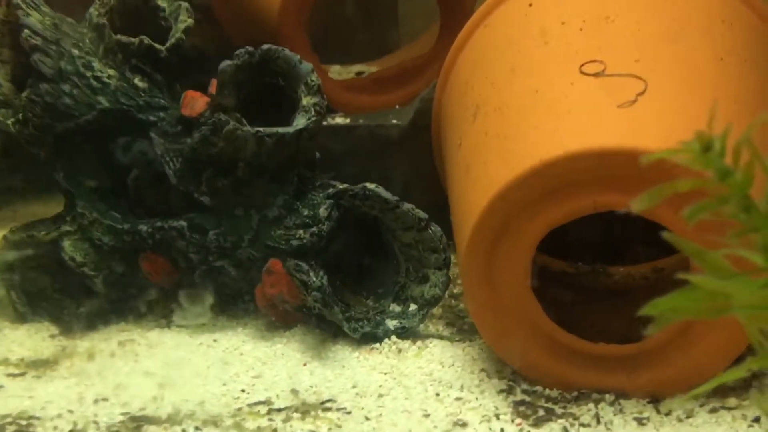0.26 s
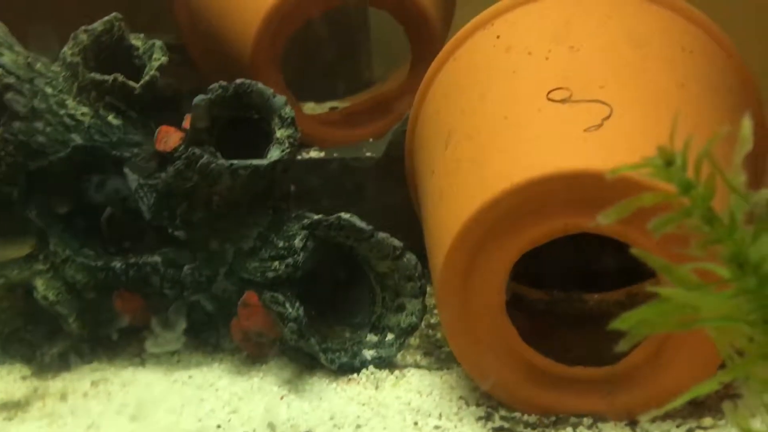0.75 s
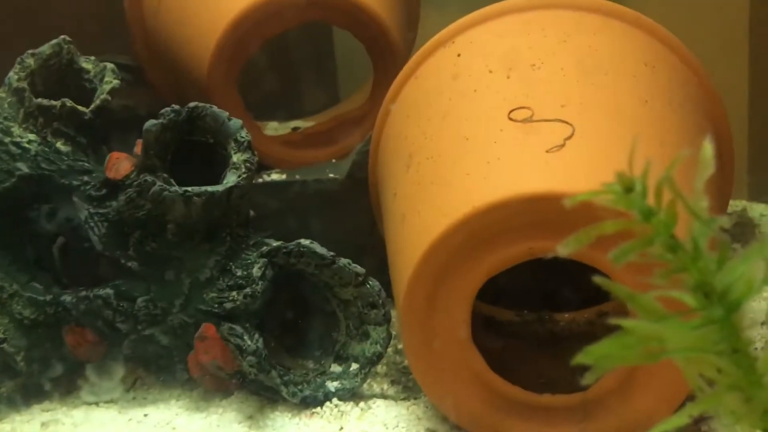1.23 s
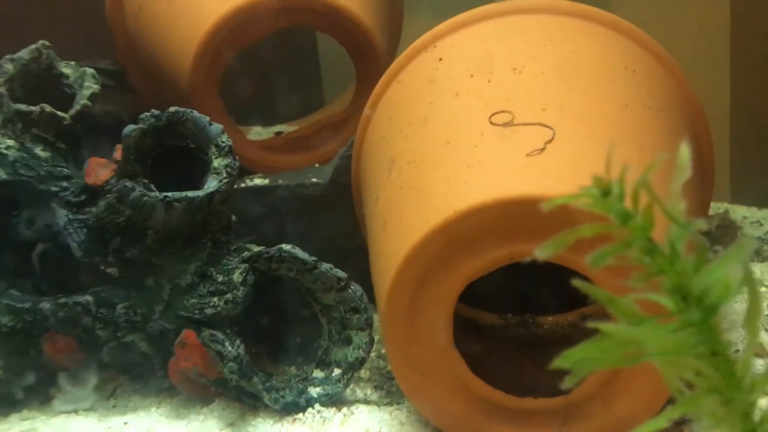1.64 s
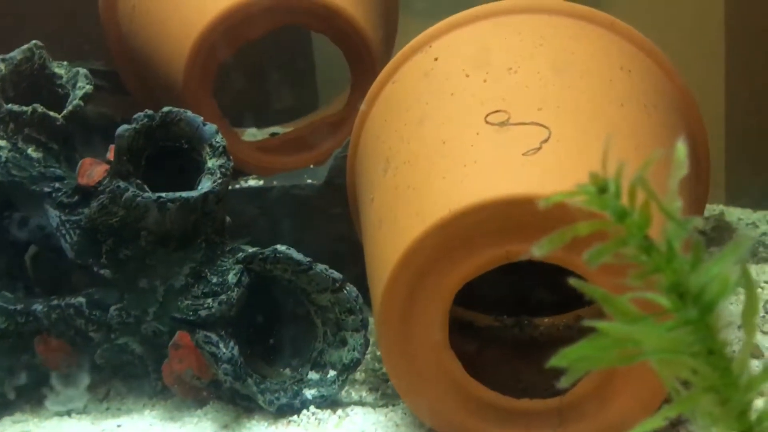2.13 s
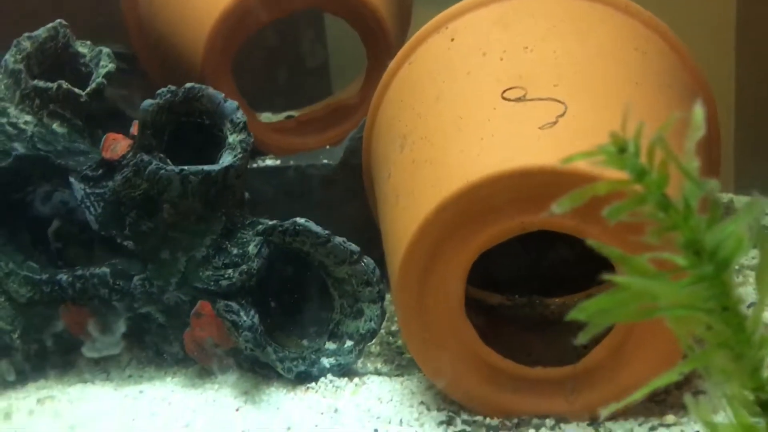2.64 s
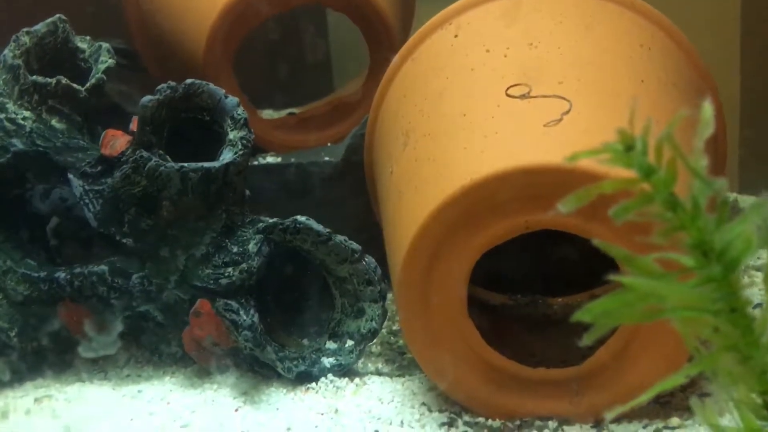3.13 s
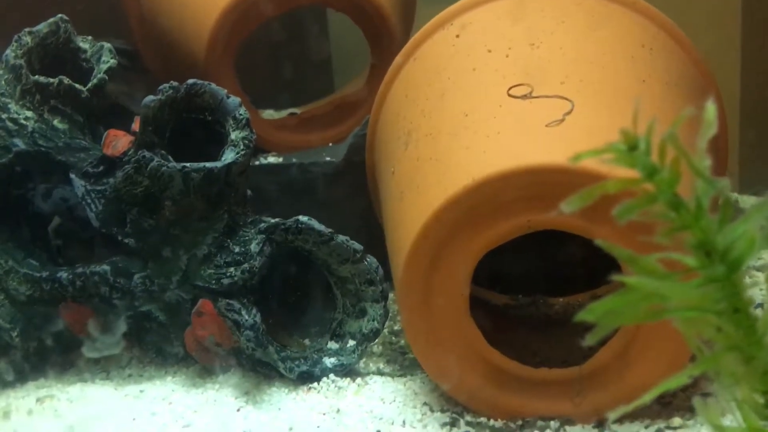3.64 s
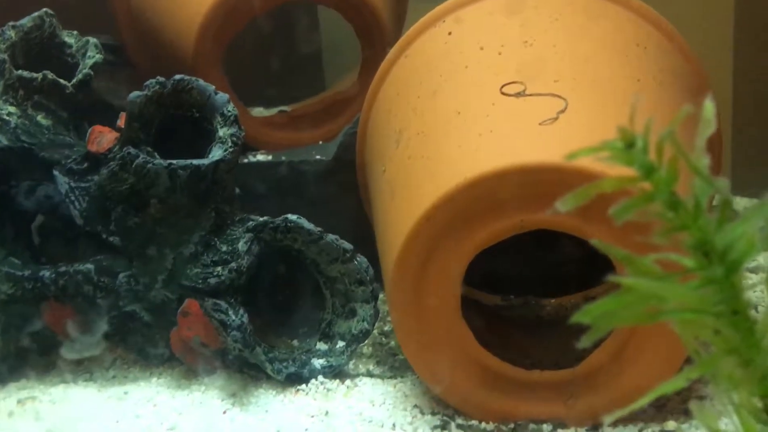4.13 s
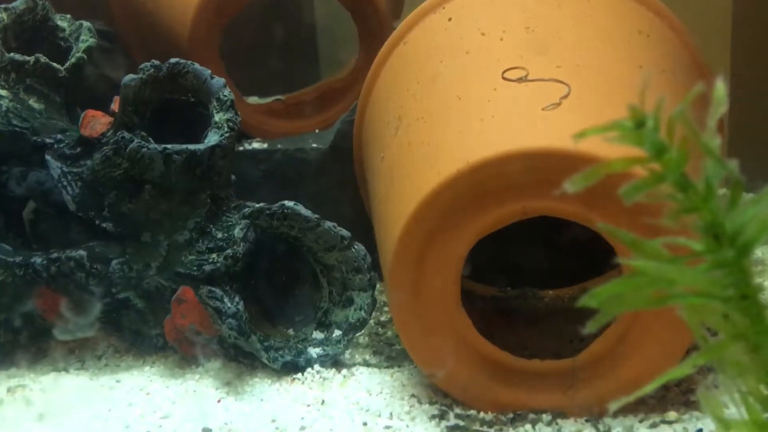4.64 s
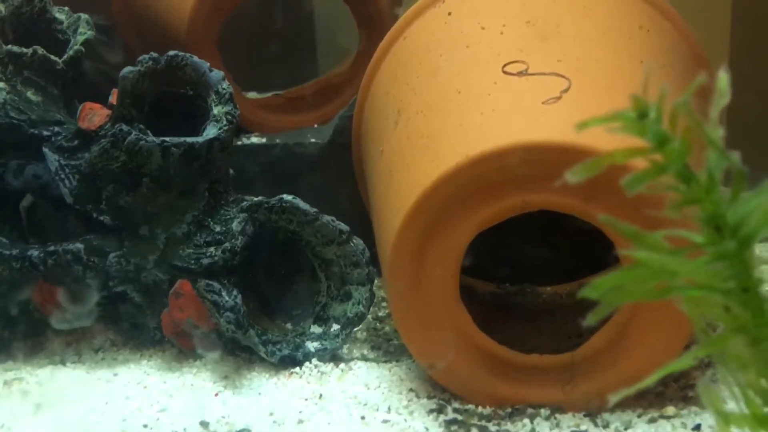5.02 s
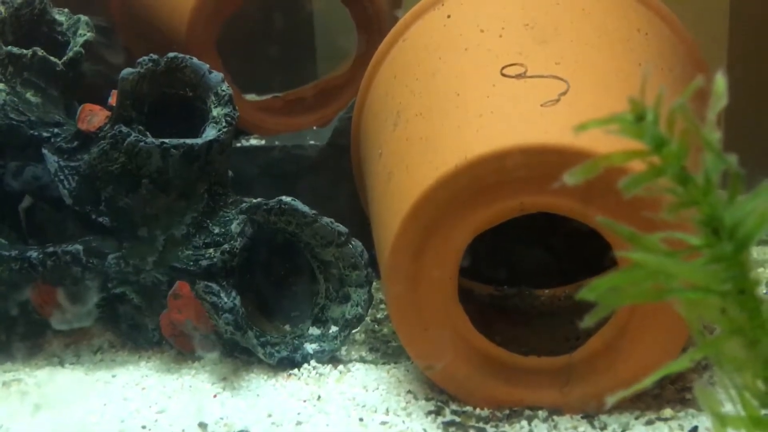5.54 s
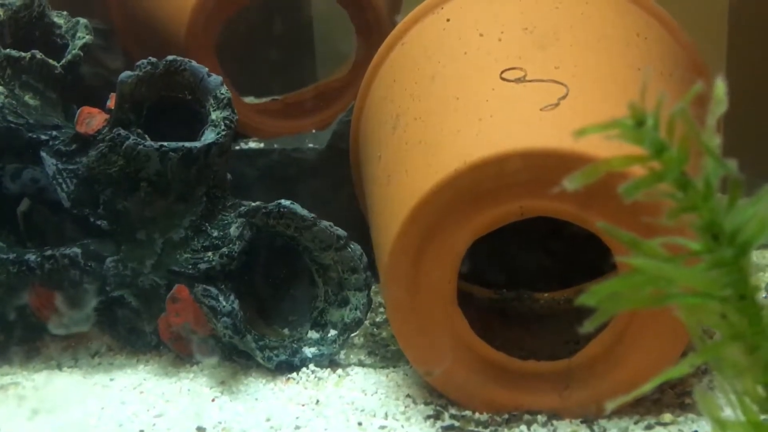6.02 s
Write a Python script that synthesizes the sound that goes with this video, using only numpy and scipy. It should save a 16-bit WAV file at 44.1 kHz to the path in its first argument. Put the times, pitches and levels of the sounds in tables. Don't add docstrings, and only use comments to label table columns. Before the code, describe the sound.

Quiet room beside a fish tank: a constant low electric hum with a nasal midrange edge and a thin, faint whine above. A rotor drone wavers underneath, swelling slightly early on. One dull thump occurs near the start, then small bubbles and watery ticks appear, mostly after three seconds. Soft hiss and low rumble lie beneath; plain mono camera sound.

```python
import sys
import numpy as np
from scipy import signal
from scipy.fft import rfft, irfft, next_fast_len
from scipy.io import wavfile
from scipy.ndimage import uniform_filter1d, map_coordinates

SR = 44100
rng = np.random.default_rng(int(sys.argv[2]) if len(sys.argv) > 2 else 0)


def dump(signal):
    limited = np.clip(np.atleast_2d(signal).T, -1, 1)
    pcm = np.round(limited * 32767).astype(np.int16)
    wavfile.write(sys.argv[1], SR, pcm)


def convert_level_to_amplitude(level_db):
    exponent = np.asarray(level_db, float) / 20
    return 10 ** exponent


N = 276546
TIME_S = np.arange(N) / SR
BLIP_S = np.arange(SR // 10) / SR


def unit(x):
    return x / np.sqrt(np.mean(x ** 2) + 1e-20)


def wobble(rate):
    at = np.arange(0, N + 64, 64)
    knots = rng.standard_normal(int(N * rate / SR) + 4)
    return np.interp(np.arange(N), at, map_coordinates(knots, [at * rate / SR]))


def trend(db, db_per_s):
    return convert_level_to_amplitude(db + db_per_s * (np.arange(N) - N / 2) / SR)


def rush(spectrum, patchy_db):
    z = signal.stft(rng.standard_normal(N + 1024), nperseg=512)[2]
    field = uniform_filter1d(rng.standard_normal(z.shape), size=6, axis=0)
    field = uniform_filter1d(field, size=10, axis=1)
    white = signal.istft(z * convert_level_to_amplitude(patchy_db * unit(field)), nperseg=512)[1][:N]
    f, db = np.transpose(spectrum)
    m = next_fast_len(N)
    hz = np.fft.rfftfreq(m, 1 / SR)
    colour = convert_level_to_amplitude(np.interp(np.log(hz + 1), np.log(f), db, -120, -120))
    return unit(irfft(rfft(white, m) * colour, m)[:N])


def add_blip(out, start_s, sound):
    out[round(start_s * SR):][:len(sound)] += sound


MAINS_HZ, SAG_HZ_PER_S = 50.018, .0019


def mains_cycles():
    return (MAINS_HZ - SAG_HZ_PER_S * TIME_S / 2) * TIME_S


# f/multiple of mains, level/dB rms
HOUSING_TONES = [(1, -73), (2, -53.9), (3, -61.4), (4, -66), (5, -60.2), (6, -77.5), (7, -56.6), (8, -55.9),
                 (9, -55.8), (10, -60.7), (11, -69.1), (12, -76), (13, -69.8),
                 (14, -74), (15, -69.5), (16, -74), (17, -64.6), (18, -62.2), (19, -64.2), (20, -82),
             (21, -79.4), (22, -75.5), (23, -82.6), (24, -76.3), (26, -77.4), (27, -82), (28, -83)]
GLASS_TONES = [(30, -84.4), (32, -79), (35, -83.8), (39, -85.4), (40, -80.7), (41, -86), (42, -76.7),
               (43, -77.8), (44, -87), (47, -86.3), (51, -94), (52, -93.6)]
PUSHES = [
    (2, .37, -1, 0),
    (5, .506, -1, .1),
    (7, .506, -1, 0),
    (12, .506, -1, .09),
    (15, .605, -1, .08),
    (20, .221, 1, .125),
    (28, .0065, 1, .1),
    (39, .381, 1, 0),
    (60, .4995, 1, 0),
]


def hum(cycles):
    out = np.zeros(N)
    since = {top: cycles - place + .0006 * wobble(.7) for top, place, *_ in PUSHES}
    force = {top: way * convert_level_to_amplitude(.25 * wobble(3)) for top, _, way, _ in PUSHES}
    for k, db in HOUSING_TONES + GLASS_TONES:
        top, *_, lag = next(p for p in PUSHES if k <= p[0])
        turns = k * since[top] - lag * (k % 2)
        out += np.sqrt(2) * convert_level_to_amplitude(db) * force[top] * np.cos(2 * np.pi * turns)
    return out


# f/multiple of mains, level/dB rms
WHINE_TONES = [(62, -94), (63, -91), (68, -93), (75, -90), (77, -90), (78, -89.5), (88, -90), (89, -90),
               (90, -89), (91, -91), (96, -90), (105, -90), (110, -93), (141, -96)]


def whine(cycles):
    out = np.zeros(N)
    for k, db in WHINE_TONES:
        phase = 2 * np.pi * (k * cycles + rng.random()) + 0.73 * wobble(1.52)
        level = convert_level_to_amplitude(db + 0.5 * wobble(0.93) + 0.74 * wobble(3.44))
        out += np.sqrt(2) * level * np.cos(phase)
    return out


BUZZ_ORDERS = (29, 112)
BUZZ_DB, BUZZ_FALL_DB, BUZZ_SCATTER_DB = -91.5, 6.5, 2.5


def buzz(cycles):
    size = 2048
    k = np.arange(size // 2 + 1)
    fall_db = BUZZ_FALL_DB * np.log2((k + 1) / BUZZ_ORDERS[0])
    level = convert_level_to_amplitude(BUZZ_DB - fall_db + BUZZ_SCATTER_DB * rng.standard_normal(len(k)))
    taken = [order for order, _ in GLASS_TONES + WHINE_TONES]
    level *= (k >= BUZZ_ORDERS[0]) & (k <= BUZZ_ORDERS[1]) & ~np.isin(k, taken)
    phases = np.exp(2j * np.pi * rng.random((3, len(k))))
    shapes = irfft(level * phases) * size / np.sqrt(2)
    place = np.arange(size) / size
    steady, *creeping = [np.interp(cycles % 1, place, s, period=1) for s in shapes]
    return steady + sum(0.21 * wobble(0.99) * c for c in creeping)


# place/cycle, f/Hz, time to fall 60 dB/s, level/dB midway, trend/dB per s
TICKS = [
    (.035, 4570, .010, -66.5, -.2),
    (.375, 5200, .005, -69, -.6),
    (.45, 3900, .009, -65.5, .2),
    (.47, 4480, .008, -70.5, 1.5),
    (.41, 9000, .007, -72, -.4),
    (.77, 6000, .005, -70, -1.5),
    (.77, 7050, .006, -71, -1),
    (.77, 8300, .007, -72, .3),
    (.77, 12600, .006, -80, -1.6),
    (.94, 5750, .005, -62, -.3),
]


def rattle(cycles):
    out = np.zeros(N)
    for place, hz, t60, db, db_per_s in TICKS:
        t = (cycles - place + .0015 * wobble(1.2)) % 1 / 50
        creep = 1 + .015 * wobble(.7)
        ring = np.sin(2 * np.pi * hz * creep * t) * convert_level_to_amplitude(-60 * t / t60) * (1 - np.exp(-t / 0.000068))
        strength = convert_level_to_amplitude(1.8 * wobble(4) + 1.5 * wobble(40))
        out += trend(db, db_per_s) * strength * ring
    return out


# place/cycle, level/dB midway, trend/dB per s
PUFFS = [
    (.38, -78, 1.5),
    (.775, -74.5, -2.7),
]
PUFF_T60_S = 0.017


def valve(cycles):
    gate = np.zeros(N)
    for place, db, db_per_s in PUFFS:
        t = (cycles - place) % 1 / 50
        gate += trend(db, db_per_s) * convert_level_to_amplitude(2.6 * wobble(3.3) - 60 * t / PUFF_T60_S)
    hiss = rush([(4000, -8), (7000, 10), (9700, 3.0), (10400, -9), (11300, 6), (15800, 4)], patchy_db=0.5)
    return gate * hiss


DRONE_HZ, DRONE_DB, DRONE_WAVER_DB = 47.3, -69, 3
# t/s, level/dB
CATCHES = [
    (.16, -58),
    (1.2, -62),
    (2.3, -65),
]
CATCH_S = 0.12


def rotor():
    level = convert_level_to_amplitude(DRONE_DB + DRONE_WAVER_DB * wobble(3))
    for s, db in CATCHES:
        level += convert_level_to_amplitude(db) * np.exp(-((TIME_S - s) / CATCH_S) ** 2)
    return level * np.sin(2 * np.pi * DRONE_HZ * TIME_S + 0.55 * wobble(2.5))


# t/s, peak level/dB, f/Hz, time to fall 60 dB/s
BUMP = (.5848, -37.5, 150, .08)


def bump():
    out = np.zeros(N + SR)
    s, db, hz, t60 = BUMP
    envelope = convert_level_to_amplitude(db - 60 * BLIP_S / t60) * (1 - np.exp(-BLIP_S / 0.0066))
    add_blip(out, s, envelope * np.sin(2 * np.pi * hz * BLIP_S))
    return out[:N]


# t/s, peak level/dB, f/Hz
BUBBLES = [
    (2.1824, -59, 6460),
    (3.0899, -54, 6550),
    (3.7015, -53, 6350),
    (3.8671, -50, 6300),
    (4.558, -53, 6800),
    (5.6196, -57, 6340),
]
BUBBLE_T60_S = 0.011
FIZZ_COUNT = 45
FIZZ_DB, FIZZ_SCATTER_DB, FIZZ_LOW_HZ, FIZZ_HIGH_HZ = -63, 1.3, 4800, 7200


def bubbles():
    out = np.zeros(N + SR)
    when, size, pitch = rng.random((FIZZ_COUNT, 3)).T
    fizz_db = FIZZ_DB - FIZZ_SCATTER_DB * np.log(size)
    fizz_hz = FIZZ_LOW_HZ + (FIZZ_HIGH_HZ - FIZZ_LOW_HZ) * pitch
    for s, db, hz in [*BUBBLES, *zip(when * N / SR, fizz_db, fizz_hz)]:
        ring = np.sin(2 * np.pi * hz * BLIP_S * (1 + 4 * BLIP_S))
        envelope = convert_level_to_amplitude(db - 60 * BLIP_S / BUBBLE_T60_S) * (1 - np.exp(-BLIP_S / 0.00042))
        add_blip(out, s, envelope * ring)
    return out[:N]


# t/s, peak level/dB, centre f/Hz
SNAPS = [(2.3176, -62, 11000), (3.238, -54, 4900), (3.4151, -57, 5200), (3.8744, -62, 14000),
         (3.9374, -61, 14000), (4.5411, -61, 6500), (5.2864, -65, 12500), (5.6486, -55.5, 13000),
         (5.6625, -56, 8200), (5.8127, -64.5, 12000), (5.8825, -61, 12500), (6.2068, -66, 11600)]
SNAP_WIDTH, SNAP_T60_S = .22, .02


def snaps():
    out = np.zeros(N + SR)
    f = np.fft.rfftfreq(len(BLIP_S), 1 / SR)
    for s, db, hz in SNAPS:
        band = np.exp(-.5 * ((f / hz - 1) / SNAP_WIDTH) ** 2)
        noise = unit(irfft(rfft(rng.standard_normal(len(BLIP_S))) * band, len(BLIP_S)))
        add_blip(out, s, convert_level_to_amplitude(db - 3.0 - 60 * BLIP_S / SNAP_T60_S) * noise)
    return out[:N]


# t/s, level/dB rms
STIRS = [
    (0, -80),
    (1.3, -73),
]
STIR_RISE_DB, STIR_FALL_DB = 24, 20
WHISTLE_DB, WHISTLE_FALL_DB = -92, 2.5


def trickle():
    stir = rush([(1000, -30), (1200, 3), (1700, -10), (3000, -24)], patchy_db=2.5)
    whistle = rush([(12300, 5), (12680, -6), (13000, -12)], patchy_db=4.0)
    level = np.zeros(N)
    for s, db in STIRS:
        level += convert_level_to_amplitude(db - np.maximum(STIR_RISE_DB * (s - TIME_S), STIR_FALL_DB * (TIME_S - s)))
    return level * stir + convert_level_to_amplitude(WHISTLE_DB - WHISTLE_FALL_DB * TIME_S) * whistle


# f/Hz, level/dB
RUMBLE = [(20, -21), (40, -9), (62, -6), (78, -3), (125, -2), (140, 0), (185, -11.5), (230, -6), (280, -9),
          (330, -11.5), (375, -28)]
BODY = [(335, -6.5), (375, 0), (430, -1), (505, -5), (530, 2.5), (578, -6.5), (610, 1.5), (645, -1),
        (680, -8.5), (720, -3), (870, -7), (912, -2.5), (985, -10.5), (1250, -19.5)]
HISS = [(900, -13), (1100, 10.5), (2300, 5), (2780, -1.5), (3900, 1.5), (4900, -1), (6300, 1.5),
        (7700, -3.5), (8300, -1.5), (9900, -4.5), (10400, -6.5), (11300, -5), (13000, -7), (15800, -12)]


def water_and_room():
    low = convert_level_to_amplitude(-61 + .3 * wobble(4.4)) * rush(RUMBLE, patchy_db=.8)
    body = convert_level_to_amplitude(-60.3 + .4 * wobble(6)) * rush(BODY, patchy_db=.4)
    high = convert_level_to_amplitude(-68 + .3 * wobble(5.4)) * rush(HISS, patchy_db=1.0)
    return low + body + high


def scene():
    cycles = mains_cycles()
    pump = hum(cycles) + whine(cycles) + buzz(cycles) + rattle(cycles) + valve(cycles) + rotor()
    water = bump() + bubbles() + snaps() + trickle()
    return (pump + water + water_and_room())[None]


def band_limit(x):
    return signal.sosfilt(signal.butter(12, 15750, fs=SR, output="sos"), x)


def record(dry):
    x = dry * (1 - np.exp(-TIME_S / 0.00038))
    m = next_fast_len(N + SR // 10)
    passed = np.fft.rfftfreq(m, 1 / SR) < 15800
    mix = irfft(rfft(x, m) * passed, m)[:, :N]
    return band_limit(mix)


dry = scene()
out = record(dry)
dump(out)
```